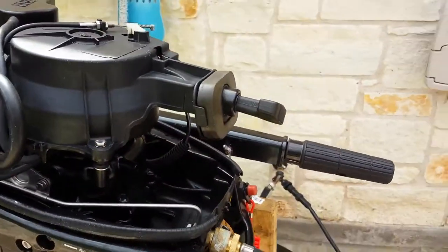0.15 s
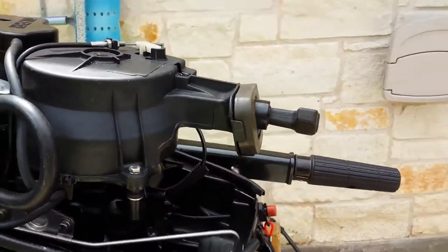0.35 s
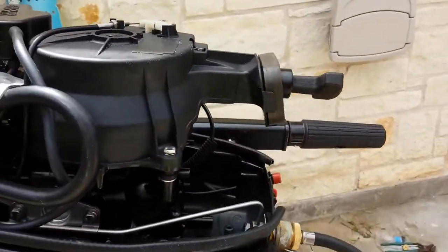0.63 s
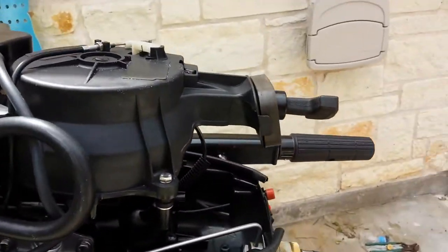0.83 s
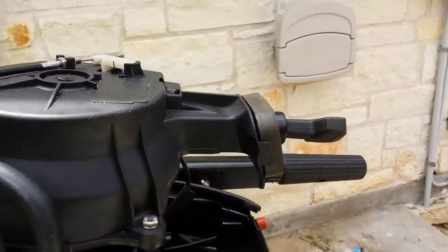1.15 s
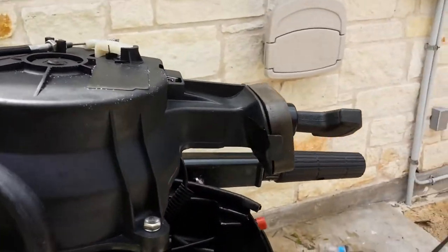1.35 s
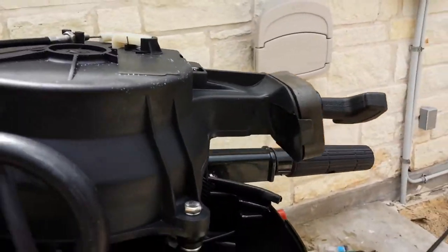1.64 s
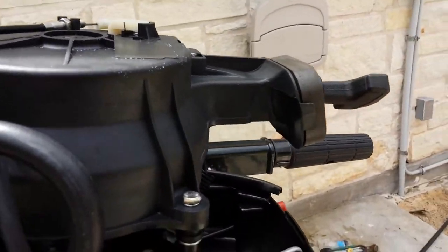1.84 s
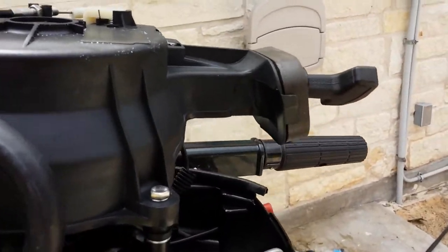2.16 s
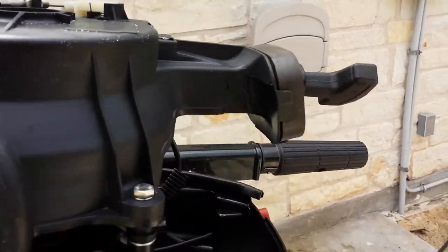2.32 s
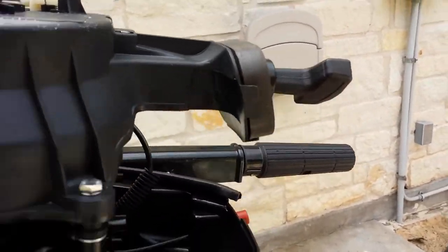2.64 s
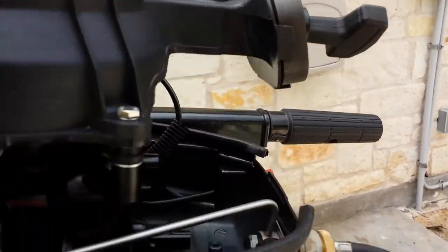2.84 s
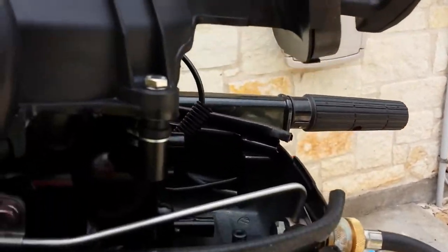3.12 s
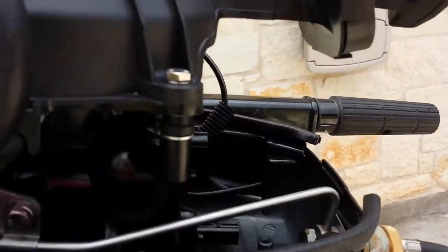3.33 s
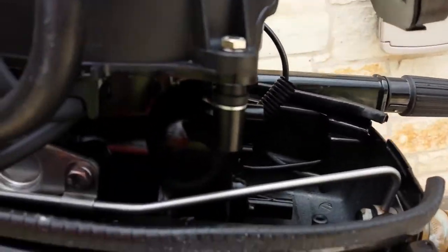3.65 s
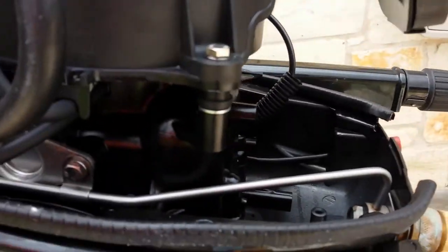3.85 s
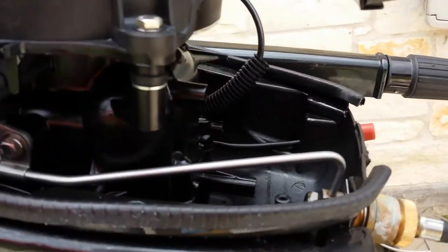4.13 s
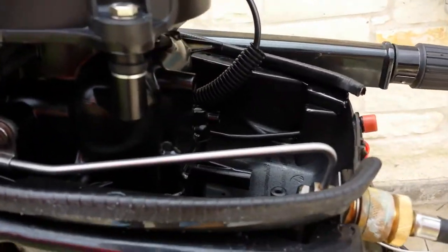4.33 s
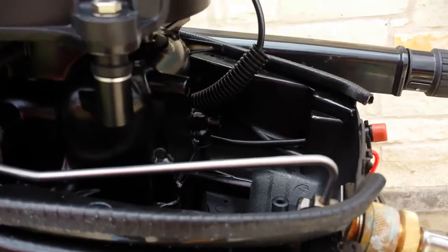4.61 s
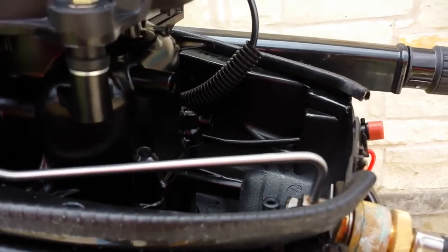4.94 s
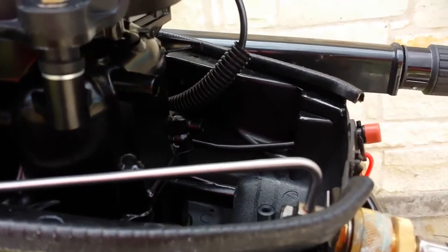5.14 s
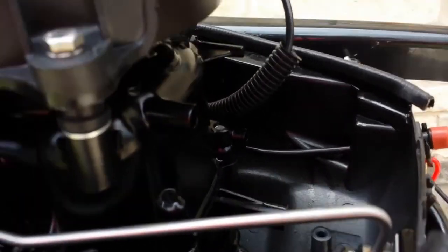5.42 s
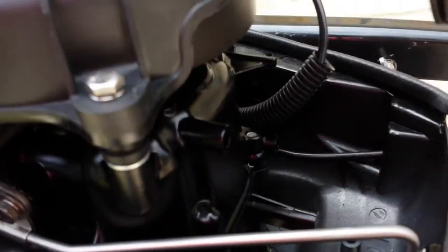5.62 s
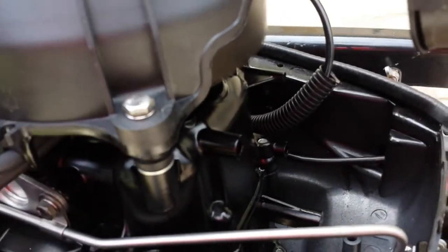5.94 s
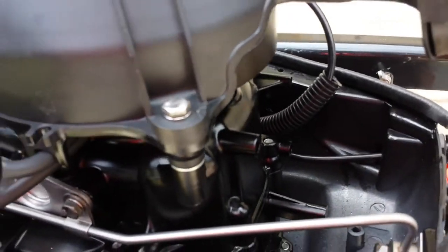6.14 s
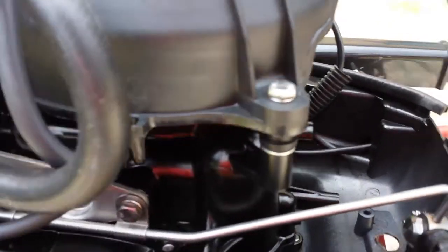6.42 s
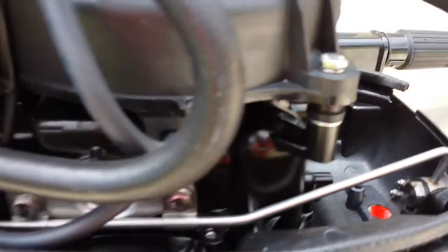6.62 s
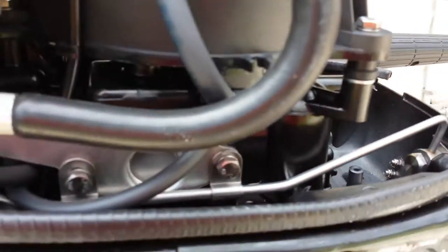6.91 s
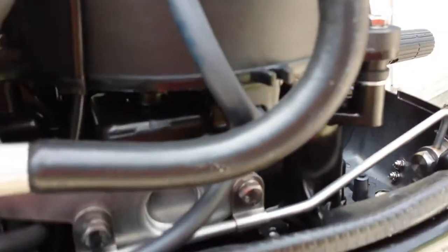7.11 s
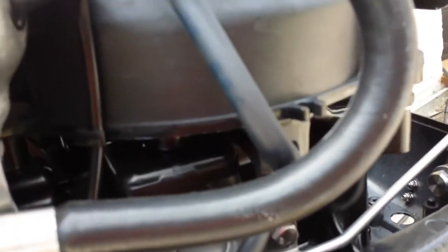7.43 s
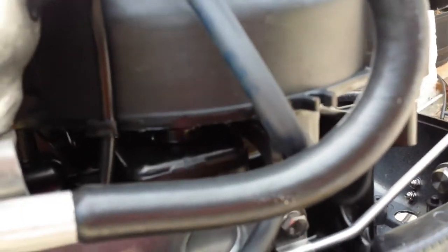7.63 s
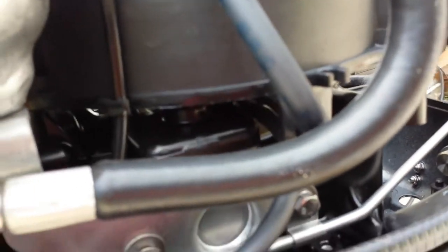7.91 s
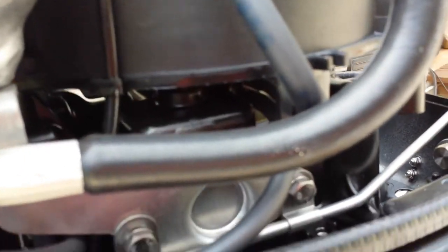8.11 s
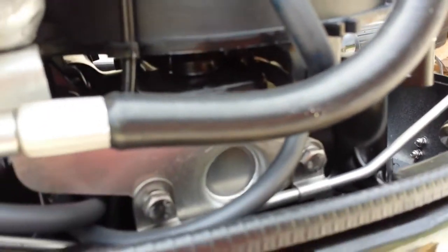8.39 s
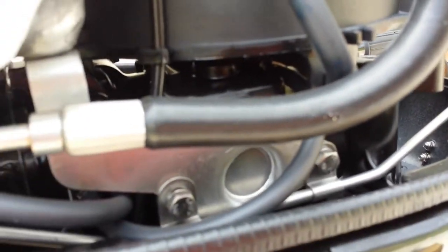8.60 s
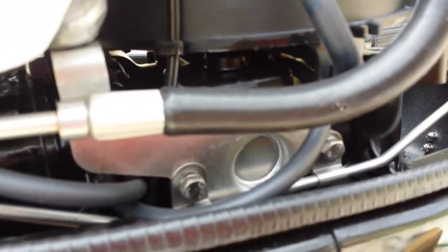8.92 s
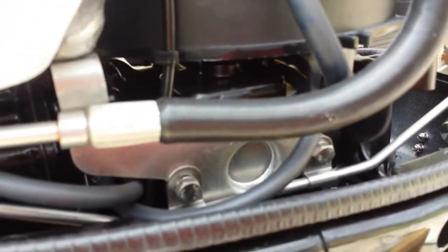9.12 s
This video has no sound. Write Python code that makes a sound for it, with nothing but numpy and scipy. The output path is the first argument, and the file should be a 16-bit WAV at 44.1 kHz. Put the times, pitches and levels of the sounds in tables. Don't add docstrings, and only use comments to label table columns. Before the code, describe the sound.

A small outboard engine, cowl off, idles without pause from 0 to about 9.3 seconds, outdoors beside a stone wall. Each fast turn, roughly eighteen per second, repeats a round of thuds, metallic clacks and valve ticks, fusing into a dense knocking rattle over a low exhaust hum near 165 hertz. At 0.4 seconds a dull tap hits the microphone case, with a weaker one at 1.05. Until 2.8 the sound is full and clattery near the starter, with a thin bracket singing faintly around 2 kilohertz. From about 2.9 it becomes shadowed; by 4 the microphone is down in the pan, with crisp dry snaps standing out until 6.4. Toward 7 it shifts to the fuel line: brighter, with hiss, light water spray and ringing cover knocks from 7.6, strongest near 7.8. Close wide stereo, treble mostly left; it ends still running.

```python
import sys
import numpy as np
from scipy import signal
from scipy.fft import rfft, irfft, next_fast_len
from scipy.io import wavfile

SR = 44100
rng = np.random.default_rng(int(sys.argv[2]) if len(sys.argv) > 2 else 0)


def rack_gain(trim_db):
    fader = np.asarray(trim_db, float)
    return 10 ** (fader / 20)


def store_pcm(level_fs):
    pcm = np.round(np.clip(level_fs, -1, 1) * 32767).astype(np.int16)
    wavfile.write(sys.argv[1], SR, np.atleast_2d(pcm).T)


N = 408366
TIME = np.arange(N) / SR
SIZE = next_fast_len(N + 8192)
HZ = np.maximum(np.arange(SIZE // 2 + 1) * SR / SIZE, 1)


def in_time(rows):
    s, *columns = np.transpose(rows)
    return [np.interp(TIME, s, column) for column in columns]


def at_hz(points, hz):
    points_hz, values = np.array(points).T[:2]
    return np.interp(np.log(hz), np.log(points_hz), values)


def drift(rate_hz):
    knots = np.arange(0, N / SR + 1, .5 / rate_hz)
    return np.interp(TIME, knots, rng.standard_normal(len(knots))) * np.sqrt(1.5)


def spell(start_s, length_s, pass_s):
    since_start = TIME - start_s
    until_end = start_s + length_s - TIME
    return np.clip(np.minimum(since_start, until_end) / pass_s, 0, 1)


# (time [s], place [0-2])
MIC_PATH = [
    (0, 0.36),
    (2.8, 0.19),
    (2.87, 0.47),
    (4.2, 1.14),
    (6.2, 1.05),
    (6.9, 1.56),
    (7.6, 1.7),
    (9.26, 1.58),
]
# (time [s], nearness [dB], hidden share [0-1])
HAND = [(0, 1, 0.4), (.55, 0.35, 0), (1.6, 0.6, 0), (2.05, 0, 0.27), (2.4, -0.8, 0), (2.82, -2, 0.2),
        (2.88, -1, 1), (3.35, -1, 1), (3.7, 0.5, 0.72), (4.4, 0, 0.82), (4.85, -1.6, 0.4), (5.7, -3, 0.4),
        (6.2, -1.5, 0.3), (6.8, 0.5, 0.11), (7.5, 0.3, 0.06), (7.8, 3, 0.02), (8.5, 0.1, 0.04),
        (9.26, 0.5, 0)]


def heard_db(row):
    *place_db, near_share, hidden_db = row
    near_db, hidden = in_time(HAND)
    return np.interp(in_time(MIC_PATH)[0], range(3), place_db) + near_share * near_db + hidden_db * hidden


# (time [s], rate [turns/s])
CRANK_SPEED = [(0.0, 18.694), (0.46, 19.04), (0.71, 19.048), (0.81, 19.101), (1.92, 18.649), (2.99, 18.524),
               (3.27, 18.118), (3.7, 17.899), (4.34, 18.387), (4.39, 18.022), (5.03, 18.211),
               (5.06, 17.886), (5.64, 18.726), (6.41, 18.187), (6.52, 18.63), (7.77, 18.153), (7.78, 17.96),
               (9.26, 18.105)]


def crank():
    first_turn = -.073
    return first_turn + np.cumsum(in_time(CRANK_SPEED)[0]) / SR


# (crank angle [turns], level over the rattle [dB], optional change at the fuel line [dB])
CONTACTS = [
    [(0.0615, 2.5), (0.1704, 2.5, 3), (.24, 3, 3), (.49, 3.5), (.6, 5.5, -2), (.7, 2, 0), (.82, 5),
     (.93, 3.5)],
    [(.02, 1.5), (.1, 4.8), (.19, 11.5), (.29, 2.5), (.46, 3, 3), (.54, 10, -6), (.68, 2.5, -5), (.855, 11),
     (.91, 6.7, -3)],
    [(.04, -1.5), (.19, 5.3, -5), (.29, 1), (.5, 5), (.58, 2.9), (.69, 7, -3), (.87, -0.5), (.93, 5.4, 3.2)],
    [(.04, 0.5), (.17, 6.5), (.24, -5), (.49, 8.9, -1), (.575, 0.5), (.68, 6.2), (.89, 5.8), (.94, 14.4)],
    [(.05, -7), (.17, 7.2, -3), (.24, 1), (.49, -1), (.575, 4), (.7, 2.5), (.89, 5.3), (0.94, 9.7)],
    [(.06, 11.5), (.17, -8), (.22, -3), (.49, 7.5), (.7, 10.5), (.87, -8)],
]
# (low edge [Hz], high edge [Hz], contact decay [s], sharp click [dB],
# share in the lull [0-1], share repeated every turn [0-1])
PARTS = [
    (30, 1100, .004, -6, .1, .6),
    (1100, 1850, .002, -9, .45, .5),
    (1850, 2700, .003, -5, .4, .42),
    (2700, 4200, .0024, 2, .7, .62),
    (4200, 9500, .003, -10, .1, .14),
    (9500, 15400, .003, -10, .4, 0),
]
CONTACT_RISE = [0.0016, 0.0013, 0.0013, 0.0006, 0.0019, 0.00058]
PAN_SWELL = [0, -1, -2, -5, -1, 0]
FLICKER = [.3, .4, .4, .5, .9, 1.9]
BARE_CLICK = [-2, 3.5, -9.5]
# (crank angle [turns], width [turns], depth [dB])
CAM_LULL = (.39, .06, -6.5)


def blows(turns, part):
    decay_s, click_db, lull_share, repeated = PARTS[part][2:]
    place = in_time(MIC_PATH)[0]
    rounds = np.arange(-1, int(turns[-1]) + 1)
    firing_db = 0.11 * (rounds % 2 - .5)
    strikes = np.zeros(N)
    for angle, db, *change_db in CONTACTS[part]:
        chance = rng.standard_normal((len(rounds), 2))
        at = np.searchsorted(turns, rounds + angle + .003 * chance[:, 0])
        begun = at > 0
        at = np.minimum(at, N - 1)
        fuel_line_db = sum(change_db) * np.clip(place[at] - 1, 0, 1)
        strikes[at] += rack_gain(db + .8 * chance[:, 1] + firing_db + fuel_line_db) * begun

    swell = signal.lfilter([1], [1, -np.exp(-1 / (decay_s * SR))], strikes ** 2)
    slow = np.exp(-1 / (CONTACT_RISE[part] * SR))
    swell = signal.lfilter([1 - slow], [1, -slow], swell)
    in_pan = np.clip(1.3 - abs(place - 1) * 2, 0, 1)
    swell = swell * rack_gain(PAN_SWELL[part] * in_pan)
    lull_angle, lull_width, lull_db = CAM_LULL
    lull = np.exp(-.5 * ((turns % 1 - lull_angle) / lull_width) ** 2)
    rattle_power = rack_gain(2 * lull_db * lull_share * lull)
    envelope = np.sqrt(rattle_power + swell) * rack_gain(FLICKER[part] * drift(11))

    since_turn = np.arange(N) - np.searchsorted(turns, np.floor(turns))
    first, second = rng.standard_normal((2, 2, SR // 10))[:, :, since_turn]
    habit = first * np.cos(0.912 * TIME) + second * np.sin(0.898 * TIME)
    fresh = rng.standard_normal((2, N))
    grains = np.sqrt(repeated) * habit + np.sqrt(1 - repeated) * fresh
    bare_db = np.interp(place, range(3), BARE_CLICK)
    return grains * envelope + rack_gain(click_db + 13.5 + bare_db) * strikes


def causal(gain_db):
    cepstrum = irfft(gain_db * np.log(10) / 20, SIZE)
    cepstrum[1:SIZE // 2] *= 2
    cepstrum[SIZE // 2 + 1:] = 0
    return np.exp(rfft(cepstrum))


# (frequency [Hz], density [dB per Hz])
COLOURS = [
    [(18, -21), (30, -26), (140, -12.5), (163, -10.5), (367, -20), (489, -16), (1250, -5), (1850, -7),
     (2000, -4), (2160, -6), (2590, -10), (4040, -27.5), (6630, -27), (14100, -40), (15300, -56)],
    [(18, -55), (30, -20), (133, -6.5), (159, 2), (275, -14.5), (314, -16.5), (761, -10), (988, -9),
     (1580, -12), (1900, -2), (3450, -16), (4040, -21), (7960, -27), (14100, -55.5), (15300, -53)],
    [(18, -57), (30, -20), (129, -20), (163, 7.5), (283, -17.5), (1040, 1), (1190, -8), (2050, -6),
     (2800, -17.5), (3190, -21), (4370, -17.5), (6630, -14.5), (9800, -28), (11500, -24.5), (15300, -44.5)],
]
# (frequency [Hz], width [Hz], gain at each of three places
# [dB])
BODY_BANDS = [(170, 95, -2.5, -6.5, -10.5), (314.5, 40, 4.5, 7.5, 6), (485.6, 67, 7.5, 6.5, 5.5),
              (795, 230, 3, 6.5, 0), (742, 56, -3, -1, -0.5), (1066.3, 21, 1.5, 6.5, 7.5),
              (1166, 33, -12, -3, -16), (1260, 105, 3, 3.5, 1.5), (1528, 250, 5.5, 3.5, 6.5),
              (1597, 130, 1, 2, -6.5), (1643, 96, 1, 2.5, 0), (1800, 110, 2, -2, 0),
              (2260, 100, -1, -0.5, -3.5), (1915, 160, -4.5, -8.5, -3.5), (2092, 15, -13, 9, 0.5),
              (2490, 150, 2.5, 1.5, 3), (2826, 390, -5.5, -3, -1), (3166, 530, -3, 0.5, 12.5),
              (2950, 110, -5, 2, 0), (3583, 200, 3, 4, 6), (3725, 78, 3, 3, 6.5), (5250, 170, -2.5, -1, 0),
              (5430, 230, 4.5, 0.5, 2.5), (8560, 310, -3, -2, -1.5), (9230, 380, 3.5, 4.5, 5),
              (345, 71, 1.5, 0.5, 1), (6370, 970, 8.5, 2, 2), (8010, 130, 8.5, 0.5, 6.5),
              (11260, 310, -2, -2, 13), (12900, 500, -5, 5, -1), (13400, 400, 2.5, 12, 5),
              (14340, 360, 9, 1, 6)]


def body(place):
    gain_db = at_hz(COLOURS[place], HZ)
    for hz, width_hz, *db in BODY_BANDS:
        gain_db = gain_db + db[place] / (1 + (2 * (HZ - hz) / width_hz) ** 2)
    panel_modes, panel_width_hz, panel_db = 150, 30, 3.5
    for hz, share in zip(rng.uniform(600, 9000, panel_modes), rng.random(panel_modes)):
        near = slice(int((hz - 300) * SIZE / SR), int((hz + 300) * SIZE / SR))
        gain_db[near] += share * panel_db / (1 + (2 * (HZ[near] - hz) / panel_width_hz) ** 2)
    return causal(gain_db)


# (frequency [Hz], likeness [0-1])
LIKENESS = [(60, 0.23), (130, 0.77), (290, 0.72), (640, 0.89), (1400, 0.31), (3070, 0.039), (6750, 0.021),
            (14800, 0.024)]
# (frequency [Hz], left over right [dB])
LEFT_OVER_RIGHT = [(60, 2.5), (600, 1), (1000, 4), (1500, 9), (2050, 13), (3300, 15.5), (4500, 10.5),
                   (6500, 18.5), (8000, 12.5), (10000, 8), (11300, -1), (14000, -0.5)]
LEFT_LAG = [7e-5, 0.0001, -0.000015]


def two_ports(place):
    alike = np.sqrt(np.clip(at_hz(LIKENESS, HZ), 0, 1))
    shade = rack_gain(-at_hz(LEFT_OVER_RIGHT, HZ))
    lead = np.exp(2j * np.pi * HZ * LEFT_LAG[place])
    left = shade ** 0
    right = shade * alike * lead
    apart = shade * np.sqrt(1 - alike ** 2)
    return np.array([left, right, apart]) * 2 / np.sqrt(1 + shade ** 2 + 2 * shade * alike)


# (level at each of three places [dB], share of nearness [0-1], change when hidden [dB])
CLATTER_HEARD = [
    (-26.5, -29, -27.5, 0.98, -1.5),
    (-24, -23.5, -24, 0.91, -0.2),
    (-25, -24.5, -25.5, 0.75, -0.6),
    (-27, -26.5, -25, 0.36, 0),
    (-29, -29, -28.5, 0.76, -5.5),
    (-41, -41, -33, 0.36, -18.5),
]


def clatter(turns):
    place = in_time(MIC_PATH)[0]
    paths = [body(k) * two_ports(k) for k in range(3)]
    out = np.zeros((2, N))
    for part, row in enumerate(CLATTER_HEARD):
        level = rack_gain(heard_db(row))
        sos = signal.butter(3, PARTS[part][:2], "band", fs=SR, output="sos")
        own, other = rfft(signal.sosfilt(sos, blows(turns, part)), SIZE)
        for k, (left, right, apart) in enumerate(paths):
            spectra = np.array([own * left, own * right + other * apart])
            heard = irfft(spectra, SIZE)[:, :N]
            at_place = np.clip(1 - abs(place - k), 0, 1)
            out += level * at_place / heard.mean(0).std() * heard
    return out


# (time [s], peak [dB])
SNAPS = [(3.3657, -13), (3.4211, -11), (3.4769, -9), (3.532, -8.5), (3.5882, -11), (3.681, -12),
         (3.7558, -11), (3.9184, -13), (3.9768, -10), (4.0297, -6), (4.085, -11), (4.2497, -9), (4.304, -9),
         (4.3594, -10), (4.4143, -11), (4.4702, -9), (4.526, -7), (4.5809, -9), (4.6355, -9), (4.6912, -8),
         (4.746, -13), (4.8009, -9), (4.8568, -16), (4.9117, -10), (4.9665, -11), (5.0219, -16),
         (5.0778, -10), (5.1327, -13), (5.188, -14), (5.2434, -14), (5.3527, -9.5), (5.5148, -13),
         (5.5687, -10), (5.6221, -13), (5.6759, -13), (5.7293, -15), (5.8366, -16), (5.8899, -10),
         (5.944, -10), (5.9992, -8), (6.0536, -12), (6.1077, -12), (6.1623, -10), (6.2172, -9),
         (6.2706, -11.5), (6.326, -15), (6.3813, -9), (6.4354, -12)]
# (frequency [Hz], level [dB], t60 [s])
SNAP_RING = [
    (2300, -5, .004),
    (3350, 0, .005),
    (4600, -7, .003),
    (6200, -12, .004),
]
# (time [s], peak [dB])
KNOCKS = [(7.6287, -9), (7.6795, -10), (7.7359, -10), (7.7908, -9), (7.8462, -7), (7.902, -10),
          (7.961, -15), (8.0138, -11), (8.181, -9), (8.2373, -8), (8.2916, -9), (8.3485, -9),
          (8.4028, -9.5), (8.5126, -12), (8.57, -13), (8.6793, -10), (8.7895, -11), (8.8449, -12),
          (8.9048, -17), (8.9566, -13), (9.014, -11), (9.1662, -11)]
# (frequency [Hz], level [dB], t60 [s])
KNOCK_RING = [
    (1480, -4, .035),
    (2040, -10, .04),
    (5400, -20, .03),
]


def struck(events, modes):
    lag_s, cut_hz = .0008, 7500
    out = np.zeros(N)
    s, db = np.transpose(events)
    at = ((s + lag_s) * SR).astype(int)
    chance = rng.standard_normal((len(s), len(modes)))
    for k, (hz, ring_db, t60) in enumerate(modes):
        clicks = np.full(N, 1e-18)
        clicks[at] = rack_gain(db + ring_db + 1.2 * chance[:, k])
        r = rack_gain(-60 / (t60 * SR))
        w = 2 * np.pi * hz / SR
        out += signal.lfilter([0, np.sin(w)], [1, -2 * r * np.cos(w), r * r], clicks)
    out = signal.sosfilt(signal.butter(4, cut_hz, fs=SR, output="sos"), out)
    return out * rack_gain(np.array([[4.5], [-9.5]]))


# (crank order [per turn], level [dB])
CRANK_ORDERS = [(1, -40), (2, -20), (3, -55), (4, -26), (5, -30), (6, -26), (7, -31), (8, -14.5), (9, 1),
                (10, -8), (11, -12.5), (12, -15.5), (13, -20), (14, -19.5), (15, -25), (16, -23.5)]
# (level at each of three places [dB], share of nearness [0-1], change when hidden [dB])
EXHAUST_HEARD = (-33.5, -35, -35, 0.5, -0.7)


def exhaust(turns):
    out = np.zeros(N)
    for order, db in CRANK_ORDERS:
        cycles = order * (turns - .225) + .54 - .02 * (order - 10) ** 2 + (order < 9) / 2
        out += rack_gain(db + .8 * drift(3)) * np.cos(2 * np.pi * cycles + .15 * drift(4))
    waver_db = .6 * drift(1.2)
    return np.sqrt(2) * rack_gain(heard_db(EXHAUST_HEARD) + waver_db - 1.44) * out


# (start [s], length [s], level [dB])
BRACKET_SPELLS = [(0.545, 2.85, -32), (.58, 0.19, -36), (0.887, 0.26, -31), (1.27, 0.12, -22),
                  (1.606, 0.19, -31), (1.82, 0.29, -32), (2.504, 0.11, -34), (2.8, 0.17, -31),
                  (3.718, .2, -27), (4, 0.31, -35), (6.4, 1.14, -35), (6.743, 0.67, -37), (7.8, 1.6, -35.5),
                  (8.98, 0.12, -26), (9.2, .2, -27)]


def bracket(turns):
    hz = 2024 + 8.3 * drift(14)
    push_db = 3.5 * np.cos(2 * np.pi * (turns - .1)) + 1.5 * drift(22)
    note = rack_gain(push_db) * np.sin(2 * np.pi * np.cumsum(hz) / SR)
    note = note / np.sqrt(np.mean(note ** 2) + 1e-20)
    sung = rack_gain(-39.5)
    for start_s, length_s, db in BRACKET_SPELLS:
        sung = sung + rack_gain(db) * spell(start_s, length_s, .065)
    ports_db = np.array([[4.3], [-9]])
    return sung * rack_gain(0.5 * drift(3.0) + ports_db) * note


# (time [s], peak [dB], frequency [Hz], t60 [s])
TAPS = [
    (0.39, -3, 300, 0.031),
    (.3897, -10.5, 514, 0.028),
    (0.41, -17.5, 150, 0.062),
    (0.419, -18, 327, 0.029),
    (1.055, -17.5, 170, 0.041),
    (1.056, -17.5, 338, 0.02),
    (1.069, -21, 151, 0.048),
    (7.74, -30, 139, 0.055),
]


def taps():
    out = np.zeros(N)
    for s, db, hz, t60 in TAPS:
        age = np.maximum(TIME - s, 0)
        soft_rise = 1 - np.exp(-age / 0.003)
        out -= rack_gain(db + 7.5 - 60 * age / t60) * soft_rise * np.sin(2 * np.pi * hz * age)
    return out


# (start [s], length [s], frequency
# [Hz], width [Hz], gain [dB])
BAND_CHANGES = [(0.7, 0.67, 2172, 21, 6.5), (0.5, 2.4, 2530, 210, 1.5), (2.5, 1.5, 1530, 140, 1.5),
                (4.5, 0.71, 1490, 98, 6), (4, 1.08, 1600, 71, -0.5), (1, 0.83, 1800, 45, 6),
                (0, 1.7, 1040, 70, 2.5), (6.5, 0.82, 850, 260, -2), (5.5, 1.05, 1600, 93, 1),
                (1.3, 1.4, 66, 70, -2), (4, 1.54, 75, 70, 3.5), (5.9, 1.21, 75, 59, -2), (6.5, 2.2, 41, 37, 2.5),
                (3.5, .9, 3370, 350, -5), (3, 0.86, 14300, 1400, 9), (0, 0.47, 13300, 2300, -6.5),
                (9, .7, 2150, 100, 3), (2.5, 1.6, 770, 86, 0), (2.5, 1.1, 4700, 530, -1.5),
                (4, 2.4, 3360, 290, 4), (4, .6, 2640, 140, -6), (6, 0.48, 2600, 200, -7.5),
                (5.5, 0.75, 480, 58, 4), (6.5, 0.99, 6200, 320, -4), (7.5, 1.1, 730, 88, -1),
                (6, 0.41, 1900, 160, 1), (7.5, .9, 3130, 180, 3), (7.55, 0.96, 1505, 150, 1.5),
                (3, 1.37, 14200, 1100, 10), (3.5, 1.2, 400, 53, 1.5), (8, 1.06, 340, 51, -0.5),
                (6.5, 0.91, 1290, 150, -11), (1.5, 0.67, 1700, 71, 0), (2, 1.55, 5000, 470, 4.5),
                (9, .8, 5400, 170, 3.5), (8.5, 2.5, 13000, 1400, -5), (2.5, 1.1, 3250, 180, -6),
                (6, 2.9, 2750, 200, 0),
                (-1, .9, 2600, 300, -3), (-0.2, .95, 1650, 73, 4), (0.5, 1.9, 1795, 50, -7),
              (5, 1.73, 11000, 1300, 2), (4.8, 1.8, 13000, 1500, -5), (3.5, 1.37, 2130, 60, 2.5),
              (6.3, 2.7, 755, 60, -2.5), (3.5, 1.8, 1570, 84, 3), (4, 4.2, 305, 50, 2),
              (3.2, .7, 500, 72, -4.5), (5.5, 0.46, 480, 60, 7), (4, 1.2, 670, 73, 2),
              (7, 1.1, 490, 72, -3), (5, 1.2, 4460, 700, 2), (-1, 2.2, 1700, 80, -2),
              (-0.5, 3.6, 2700, 90, 2), (1.7, 0.71, 1110, 200, 4), (2, 3.1, 1850, 90, -2),
              (3, 1.32, 1260, 70, -0.5), (3.5, 0.95, 5800, 560, 5), (4, 2.3, 1680, 150, 1.5),
              (6.5, 0.89, 2500, 200, 2), (7.7, 0.71, 1500, 130, -2), (-0.4, 1.1, 1800, 70, -3),
              (6.5, 0.9, 1265, 180, 4.5), (7.5, 0.57, 1470, 300, -5), (6, 0.53, 1150, 270, -3),
              (4.5, 1.73, 775, 25, 4), (5.5, 0.57, 495, 50, 3), (4.5, 0.97, 330, 60, 2),
              (3, 1.9, 1490, 120, 2.5), (6.5, 0.84, 13000, 2500, -8), (2.5, 1.2, 11000, 1500, -1.5)]


def change_bands(x):
    out = x.copy()
    for start_s, length_s, hz, width_hz, db in BAND_CHANGES:
        near = slice(max(int((start_s - .1) * SR), 0), int((start_s + length_s) * SR))
        band = signal.lfilter(*signal.iirpeak(hz, hz / width_hz, SR), x[:, near])
        gain = rack_gain(db * spell(start_s, length_s, .12)[near])
        out[:, near] += (gain - 1) * band
    return out


def scene():
    turns = crank()
    low_pan = rack_gain(np.array([[.8], [-.8]]))
    engine = change_bands(clatter(turns) + exhaust(turns) * low_pan)
    blows_apart = struck(SNAPS, SNAP_RING) + struck(KNOCKS, KNOCK_RING)
    return engine + blows_apart + bracket(turns) + taps() * low_pan


def roll_off(x):
    return signal.sosfilt(signal.butter(12, 14680, fs=SR, output="sos"), x)


def record(dry):
    rounded = dry / (1 + (dry / 1.02) ** 4) ** .25
    return roll_off(rounded)


dry = scene()
out = record(dry)
store_pcm(out)
```